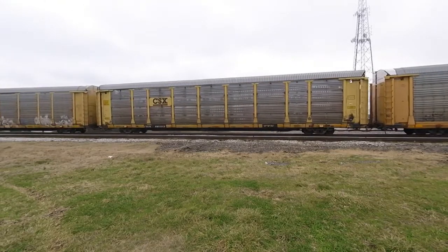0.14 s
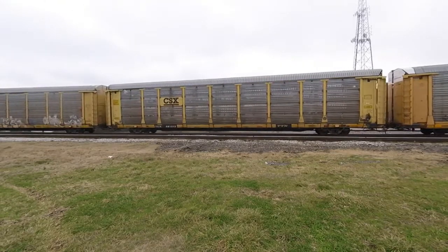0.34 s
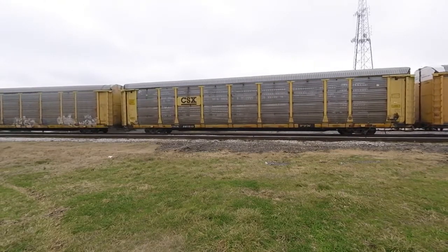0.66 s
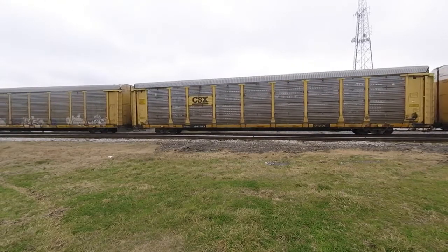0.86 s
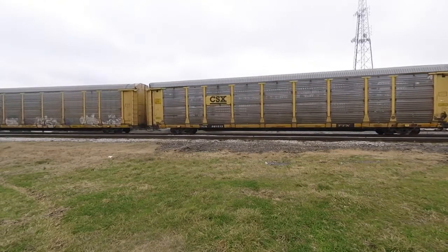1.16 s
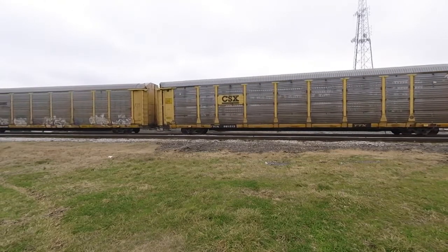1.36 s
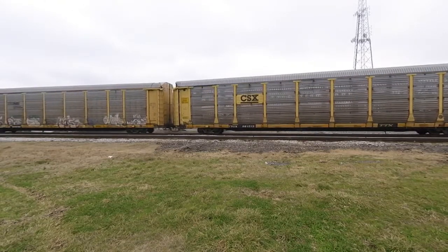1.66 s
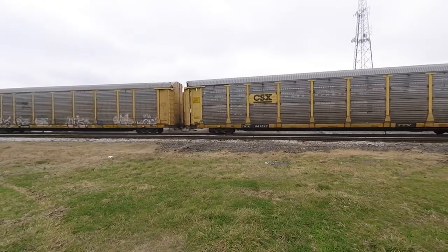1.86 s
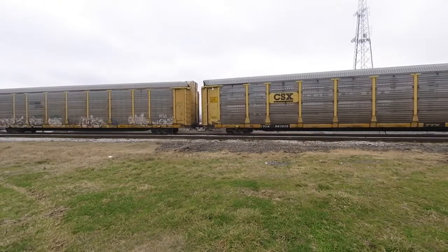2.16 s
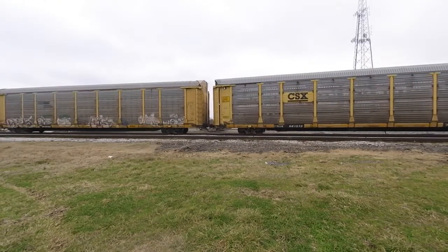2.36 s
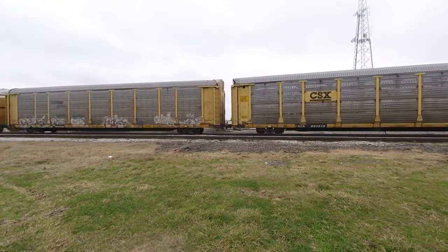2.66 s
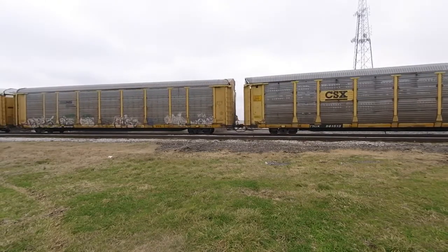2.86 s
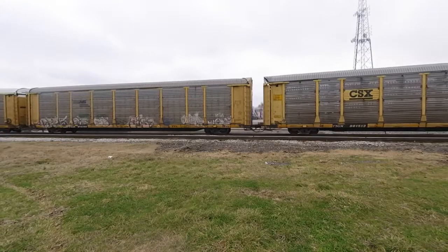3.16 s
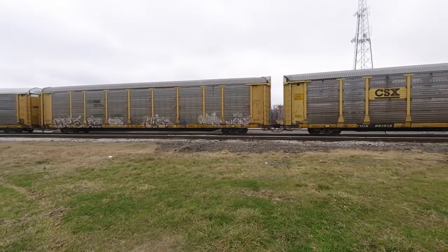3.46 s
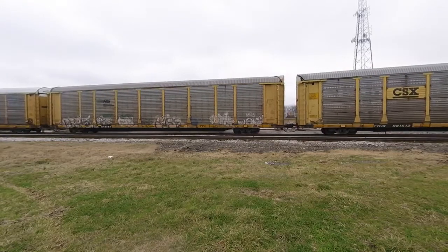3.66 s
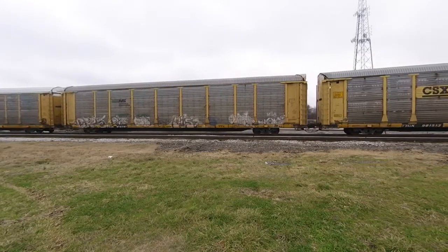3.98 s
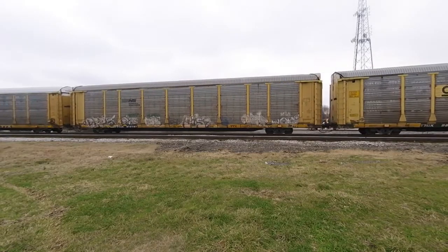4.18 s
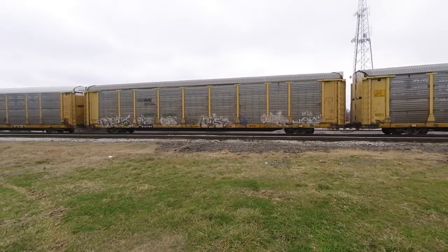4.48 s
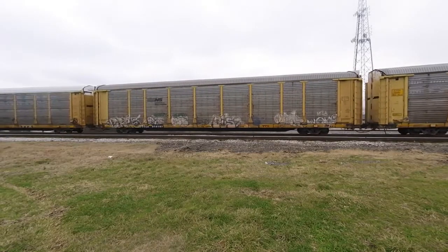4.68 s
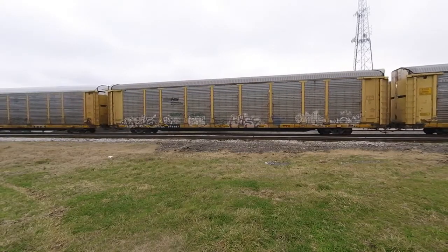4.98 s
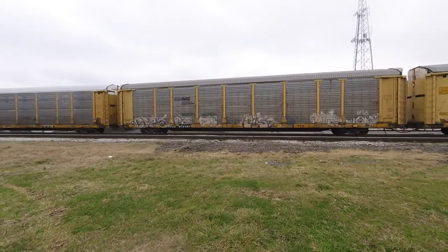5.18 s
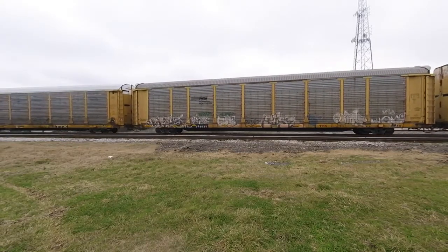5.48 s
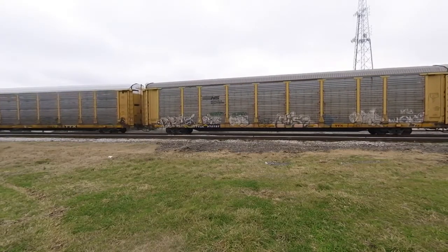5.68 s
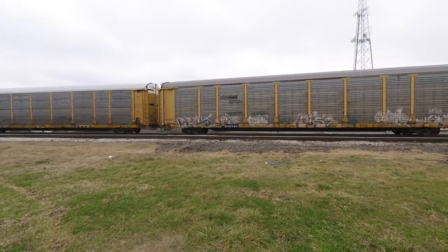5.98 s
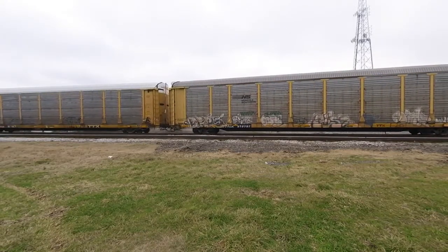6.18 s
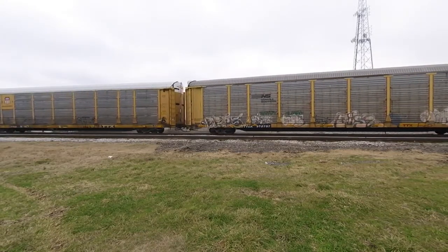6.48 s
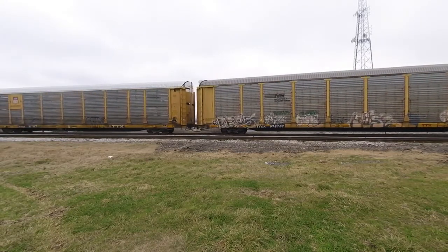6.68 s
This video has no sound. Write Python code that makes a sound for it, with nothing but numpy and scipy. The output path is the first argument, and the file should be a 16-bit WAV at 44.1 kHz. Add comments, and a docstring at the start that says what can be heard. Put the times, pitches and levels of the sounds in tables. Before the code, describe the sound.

Outdoors beside a railway track, slow freight cars pass. Wheel flanges squeal in clustered high metallic tones with a harsh scrape, ease off after about a second, then burst back. A second wheel takes over around three seconds with steadier, slightly lower ringing. Rolling rumble pulses softly underneath, and wind thumps and gusts on the exposed microphone, strongest mid-way. A low throbbing hum arrives near the end.

```python
"""Squealing, ringing flanges over a low rumble: freight cars roll slowly past a grassy field on a windy day.
Two wheels in turn rub their flanges on the rail: random friction rings many narrow modes of the steel,
which sink in pitch as the wheel passes. Strong modes lock into held tones; others catch by chance.
Shaped noise makes the scrape and the rolling; a throbbing low mode makes the drone.
Wind on the microphone is low and gusting noise with short pressure buffets."""
import sys
import numpy as np
from scipy import signal
from scipy.io import wavfile
from scipy.ndimage import uniform_filter1d

SR = 44100
rng = np.random.default_rng(int(sys.argv[2]) if len(sys.argv) > 2 else 0)


def transcribe(signal):
    """Save signal, clipped to [-1, 1], as a 16-bit WAV file at the path in sys.argv[1]."""
    frames = np.atleast_2d(signal).T
    limited = np.clip(frames, -1, 1)
    pcm = np.round(limited * 32767).astype(np.int16)
    wavfile.write(sys.argv[1], SR, pcm)


N = 301644
T_S = np.arange(N) / SR


def gain_of(db):
    """Amplitude gain of a level in dB."""
    return 10 ** (np.asarray(db) / 20)


def evened(x):
    """Scale to rms 1."""
    return x / np.sqrt(np.mean(x ** 2) + 1e-20)


def columns(rows):
    """Every column after the time column, as a curve over all samples."""
    s, *rest = np.transpose(rows)
    return [np.interp(T_S, s, column) for column in rest]


def drift(hz, length):
    """Slow random curve: one-pole filtered noise, changing about hz times a second."""
    knot_rate_hz = 40
    knots = rng.standard_normal(int(length / SR * knot_rate_hz) + 80)
    pole = np.exp(-np.pi * hz / 20)
    knots = evened(signal.lfilter([1], [1, -pole], knots)[40:])  # start-up dropped
    return np.interp(np.arange(length) / SR * knot_rate_hz, np.arange(len(knots)), knots)


def mode(hz, width_hz, length, skirt=1.0, steady=0., spread=1.56):
    """A mode rung by random friction: narrow core on a wide gritty skirt; stick-slip steadies the core (0-1)."""
    step = 32  # samples per point of the slow envelope
    a, b = rng.standard_normal((2, length // step + 402))
    push = a + 1j * b
    core_pole = np.exp(-np.pi * width_hz * step / SR)
    grit_pole = np.exp(-np.pi * spread * width_hz * step / SR)

    core = signal.lfilter([1], np.convolve([1, -core_pole], [1, -core_pole]), push)
    core /= np.sqrt(np.mean(abs(core) ** 2))
    core = core / (abs(core) + 0.14) ** np.clip(steady, 0, 1)
    grit = np.sqrt((1 - grit_pole ** 2) / 2) * signal.lfilter([1], [1, -grit_pole], push)
    slow = (skirt * grit + core)[400:]  # start-up dropped

    at, points = np.arange(length) / step, np.arange(len(slow))
    envelope = np.interp(at, points, slow.real) + 1j * np.interp(at, points, slow.imag)
    phase = 2 * np.pi * np.cumsum(hz * np.ones(length)) / SR
    return evened((envelope * np.exp(1j * phase)).real)


def noise(spectrum, level_db, patchy_db, flicker_db, size=512):
    """Random short-time spectra with drifting patches and a flicker shared by all bins."""
    hop = size // 4
    frames, hz = N // hop + 5, np.fft.rfftfreq(size, 1 / SR)
    a, b, patches = rng.standard_normal((frames, len(hz), 3)).T
    patches = uniform_filter1d(patches, size // 100, 0)  # over frequency
    patches = evened(uniform_filter1d(patches, 8192 // size, 1))  # over time
    flicker = evened(uniform_filter1d(rng.standard_normal(frames), 2048 // size + 1))

    f, db = np.transpose(spectrum)
    shape_db = np.interp(np.log(hz + 1), np.log(f), db, -120, -120)
    bins_db = shape_db[:, None] + patchy_db * patches + flicker_db * flicker
    x = signal.istft((a + 1j * b) * gain_of(bins_db), nperseg=size, noverlap=size - hop)[1][:N]
    return gain_of(level_db) * evened(x)


def held(spells, first, length):
    """Gain of a mode over its spells: lock, hold, let go; powers add."""
    lock_s, let_go_s = 0.046, 0.04
    t = (first + np.arange(length)) / SR
    power = np.zeros(length)
    for start, end, db in spells:
        ramp = np.minimum((t - start) / lock_s + .5, (end - t) / let_go_s + 1)
        power += gain_of(db) ** 2 * np.clip(ramp, 0, 1) ** 2
    return np.sqrt(power)


def wheel(sings, rings, pitch, rub_db, idle_db, catch_db, skirt, steady, fade_s):
    """Strong modes idle with the rubbing and lock into held tones; the rest catch or let go by chance."""
    # spells of held tone, keyed by mode f/Hz: start/s, end/s, level/dB before flutter and wheel fade
    spells = { "6540": [(0, .3, -33.5), (.3, .64, -27), (.66, .83, -34), (1.57, 1.95, -29),
              (1.98, 2.18, -26.5), (2.3, 2.4, -31), (2.5, 2.85, -35), (2.93, 3.3, -34.5)],
              "5400": [(0, .3, -33), (.4, .58, -35.5), (1.62, 1.9, -44), (1.98, 2.22, -38),
              (2.6, 3.1, -48)], "4772": [(0, .6, -42), (1.62, 1.9, -38), (2.05, 2.15, -38),
              (2.22, 2.4, -35.5), (2.7, 2.8, -43), (2.83, 2.93, -38)], "3432": [(0, .28, -44.5),
              (.34, .6, -43.5), (1.65, 1.8, -37.5), (1.8, 1.97, -45)], "2890": [(.05, .42, -39.5),
              (1.56, 1.68, -39), (1.75, 1.9, -39), (2.16, 2.25, -37), (2.33, 2.4, -42), (2.47, 2.58, -39),
              (2.7, 2.83, -36), (3.15, 3.25, -38)], "3745": [(.2, .45, -41), (1.6, 1.9, -48),
              (2.45, 2.6, -45)], "5210": [(3.25, 6.84, -39.5), (3.3, 3.68, -26.5), (3.75, 4, -37),
              (3.97, 4.14, -31), (4.18, 4.4, -29.5), (4.5, 4.97, -29.5), (5.05, 5.6, -41),
              (5.45, 5.62, -35), (5.7, 5.95, -35), (6.04, 6.24, -28.5), (6.35, 6.5, -33),
              (6.5, 6.8, -32.5)], "3412": [(3.28, 6.84, -44), (3.3, 3.5, -32), (3.45, 3.72, -34.5),
              (3.75, 3.8, -37), (3.97, 4.2, -35.5), (4.18, 4.47, -31.5), (4.55, 4.6, -37),
              (4.88, 5.08, -34), (5.1, 5.3, -35.5), (5.43, 5.7, -29), (5.72, 6.1, -35), (6.05, 6.38, -31.5),
              (6.45, 6.7, -39)], "2608": [(3.0, 3.15, -36), (3.3, 3.4, -42), (3.5, 3.65, -37),
              (3.78, 4.0, -37.5), (4.06, 4.16, -31.5), (4.25, 4.6, -37), (4.9, 5.2, -40), (5.45, 5.58, -40),
              (5.7, 6.0, -34), (6.08, 6.5, -35), (6.6, 6.84, -38.5)], "4290": [(2.98, 6.84, -45.5),
              (2.98, 3.2, -34), (4.58, 4.85, -37.5), (4.8, 5, -34), (5.07, 5.25, -37.5), (5.27, 5.45, -41),
              (5.8, 6.3, -40), (6.3, 6.5, -35.5), (6.55, 6.9, -42)], "6082": [(3.3, 4.15, -49),
              (4.85, 5.05, -41.5), (5.18, 5.58, -38), (5.78, 6.05, -35), (6.05, 6.3, -32), (6.3, 6.55, -37),
              (6.65, 6.84, -33.5)], "8620": [(5.75, 5.95, -42), (6.05, 6.2, -48), (6.28, 6.42, -42),
              (6.5, 6.84, -58)]}
    first, last = round(fade_s[0][0] * SR), min(round(fade_s[-1][0] * SR), N)
    length = last - first
    rub_db, factor = rub_db[first:last], columns(pitch)[0][first:last]
    sound = np.zeros(length)
    for hz, width_hz in sings:
        bent_hz = hz * factor * (1 + 0.0006 * drift(3.72, length))  # contact load bends the pitch
        level = np.hypot(held(spells[str(hz)], first, length), gain_of(rub_db + idle_db))
        flutter_db = 1.3 * drift(12, length)
        sound += level * gain_of(flutter_db) * mode(bent_hz, width_hz, length, skirt, steady)
    for hz, db in zip(*rings):
        catch = np.minimum(drift(2.5, length), 1.3)
        width_hz = 18 + 0.0039 * hz  # higher modes lose more
        sound += gain_of(rub_db + db + catch_db * catch) * mode(hz * factor, width_hz, length)
    out = np.zeros(N)
    out[first:last] = sound * np.interp(T_S[first:last], *np.transpose(fade_s))
    return out


def first_wheel(rub_db):
    """Flange of the first wheel: friction-rung modes, Doppler falling as it passes."""
    # strong modes: f/Hz, core width/Hz
    strong_modes = [(6540, 24), (5400, 24), (4772, 20), (3432, 16), (2890, 40), (3745, 28)]
    # weaker modes, two lists: f/Hz; level/dB over this wheel's rubbing
    weak_modes = ([1820, 1940, 2150, 2640, 3140, 4290, 4390, 5080, 5600, 5800, 6170, 6430, 6920, 2990, 3600,
                  4580, 5250, 5500, 5950, 7520, 8300, 8650, 9150, 9600, 10250, 10600, 11700, 12300, 12700,
                  13000, 13400, 13900], [-2, -2, -4, -2, 1, -1, -3, 0, 0, 2, -2, 0, -8, -2, -4, -2, 0, 0,
                  -1, -9, -11, -11, -17, -15, -11, -24, -30, -25, -23, -26, -30, -29])
    # Doppler: t/s, pitch factor
    doppler = [(0, 1.005), (.9, 1.004), (1.6, .998), (2.3, .996), (2.7, .993), (3.4, .992)]
    fade = [(0, 0.99), (3.15, 0.77), (3.4, 0.43)]  # t/s, gain; silent afterwards
    return wheel(strong_modes, weak_modes, doppler, rub_db - 14, idle_db=0, catch_db=5.6,
                 skirt=1.05, steady=0.64, fade_s=fade)


def second_wheel(rub_db):
    """Flange of the second wheel: other modes with steadier cores, falling in pitch likewise."""
    # strong modes: f/Hz, core width/Hz
    strong_modes = [(5210, 22), (3412, 18), (2608, 45), (4290, 32), (6082, 28), (8620, 24)]
    # weaker modes, two lists: f/Hz; level/dB over this wheel's rubbing
    weak_modes = ([1810, 1900, 2200, 2800, 3200, 2670, 5160, 5310, 5790, 6970, 7050, 7720, 7900, 8090, 8330,
                  8930, 9510, 10000, 10300, 10750, 11170, 11550, 12270, 12900, 13280, 13750], [-2, -2, -7,
                  -7, -7, -2, 0, -2, -6, -6, -8, -19, -14, -11, -16, -14, -16, -16, -21, -26, -21, -31, -25,
                  -28, -23, -33])
    # Doppler: t/s, pitch factor
    doppler = [(2.9, 1.004), (4.8, 1.003), (5.6, .998), (6.3, .994), (6.84, .992)]
    fade = [(2.9, 0.16), (3.3, 0.83), (6.84, 0.83)]  # t/s, gain
    return wheel(strong_modes, weak_modes, doppler, rub_db - 10.5, idle_db=-10, catch_db=2.9,
                 skirt=0.75, steady=0.81, fade_s=fade)


def squeals():
    """One mode catches for a moment, then dies away."""
    # short squeals: start/s, end/s, f/Hz, core width/Hz, level/dB before the taper
    catches = [(0, .55, 7530, 50, -47), (.1, .5, 1940, 10, -45.5), (.55, .72, 2150, 10, -44),
               (.7, .9, 1450, 12, -45), (1.33, 1.56, 4840, 70, -47), (1.58, 1.72, 2640, 35, -44),
               (1.59, 1.76, 1820, 30, -36.5), (1.6, 1.78, 6260, 30, -36), (1.6, 1.9, 6920, 20, -47),
               (1.6, 1.8, 4270, 40, -47), (1.62, 1.78, 5085, 25, -39), (2.0, 2.2, 12700, 50, -57),
               (2.03, 2.24, 5780, 35, -33), (2.55, 3.0, 1940, 12, -52), (2.9, 3.15, 10220, 54, -46),
               (3.15, 3.9, 6490, 30, -41), (3.72, 3.92, 4760, 15, -44), (4.2, 4.75, 8110, 32, -47),
               (4.2, 5.0, 13300, 40, -65), (5.2, 5.45, 5025, 15, -39), (5.75, 6.84, 11130, 50, -60),
               (5.78, 6.3, 2533, 10, -35.5), (5.85, 6.25, 2650, 15, -38), (5.95, 6.27, 5135, 12, -32.5),
               (6.08, 6.27, 5020, 30, -37), (6.3, 6.45, 4205, 15, -41), (6.45, 6.68, 5320, 25, -34),
               (6.68, 6.82, 4975, 15, -46), (6.72, 6.84, 5915, 22, -41)]
    out = np.zeros(N)
    for start, end, hz, width_hz, db in catches:
        part = out[round(start * SR):round(end * SR)]
        tone = mode(hz, width_hz, len(part), skirt=0.76, steady=0.28)
        part += gain_of(db) * tone * signal.windows.tukey(len(part), .5)
    return out


def rubbing_db():
    """How hard the flanges rub the rail; the contact chatters."""
    # rubbing before chatter: t/s, level/dB
    rub = [(0, -32.5), (.13, -33), (.45, -35.5), (.7, -34.5), (.85, -36.5), (.95, -44.5), (1.22, -49.5),
           (1.28, -44), (1.54, -47.5), (1.59, -31), (1.72, -28), (2.0, -36.5), (2.19, -32.5), (2.32, -37.5),
           (2.58, -32.5), (2.85, -31.5), (3.05, -36.5), (3.5, -35), (4.1, -35.5), (4.45, -37.5),
           (4.85, -35), (5.15, -37.5), (5.35, -35.5), (5.5, -32), (5.9, -33), (6.2, -28), (6.45, -31.5),
           (6.84, -30)]
    return columns(rub)[0] + 0.74 * drift(6.2, N)


def scrape(rub_db):
    """Broad friction noise following the rubbing."""
    # noise colour: f/Hz, relative density/dB
    colour = [(1200, -16), (2000, -7.5), (3000, -7), (4000, -9.5), (4700, -0.5), (5600, 2), (6300, -2),
              (7000, -10.5), (7400, -18.5), (9000, -17.5), (10600, -39), (11200, -70), (12800, -42),
              (14200, -50)]
    # the second wheel scrapes less and rings more: t/s, trim/dB
    trim = [(0, 0.2), (3.1, .6), (3.5, -0.3), (5.3, -1.2), (6.84, 0)]
    return noise(colour, rub_db + columns(trim)[0], patchy_db=1.4, flicker_db=1.8)


def rolling():
    """Rolling noise; a rough patch of tread modulates it once per turn of the wheel."""
    # noise colour: f/Hz, relative density/dB
    colour = [(150, -16.5), (350, -5), (500, -0.5), (800, -3), (1200, -7), (1600, -9.5), (2400, -12),
              (3500, -16), (5000, -32)]
    # rolling: t/s, base level/dB, swell per turn/dB (negative dips)
    levels = [(0, -38, 3), (1.0, -39, 5), (1.9, -38, 6.5), (2.6, -35, 7), (3.0, -38, 4), (3.7, -40, 1),
              (4.05, -35.5, 1.5), (4.3, -35.5, 3), (4.6, -36.5, 2), (5.1, -39.5, -1.5), (5.9, -36.5, -2),
              (6.84, -36.5, 0.5)]
    turn_s, turn_start_s, top = .405, 0.027, 0.27  # top: share of a turn at which the swell peaks
    db, swell_db = columns(levels)
    turn = (T_S - turn_start_s) / turn_s % 1
    swell = np.minimum(turn / top, (1 - turn) / (1 - top))
    return noise(colour, db + swell_db * swell, patchy_db=0.95, flicker_db=0.91)


def drone():
    """A low hum swells as the next car body draws near, and throbs."""
    # hum: t/s, level/dB before the throb, throb depth (0-1)
    swell = [(5.7, -24, 0.04), (6.0, -28, 0), (6.3, -28.5, 0.59), (6.7, -26.5, 0.6), (6.84, -28, 0.8)]
    drone_hz, throb_s, throb_top_s, onset_s = 101.7, 0.203, 6.66, 0.14
    db, depth = columns(swell)
    throb = 1 + np.clip(depth, 0, 1) * np.cos(2 * np.pi * (T_S - throb_top_s) / throb_s)
    onset = np.clip((T_S - swell[0][0]) / onset_s, 0, 1)
    return onset * gain_of(db) * throb * mode(drone_hz, 4.4, N, skirt=0.17, steady=0.77)


def wind():
    """Low wind and brighter gusting, shifted by each heave and shaken together by eddies."""
    # low wind colour: f/Hz, relative density/dB
    low_colour = [(15, -11), (30, -2), (50, -2.5), (80, -3.5), (120, -10.5), (200, -27.5), (300, -70)]
    # gusting colour: f/Hz, relative density/dB
    gust_colour = [(60, -37), (110, 2.5), (150, 1.5), (230, -1), (330, -10.5), (500, -18.5), (900, -31)]
    # wind before heaves and eddies: t/s, low level/dB, gusting level/dB
    air = [(0, -27.5, -33.5), (.9, -27.5, -34), (1.3, -26.5, -32), (1.7, -24.5, -32), (2.05, -27, -31.5),
           (2.4, -25, -30), (2.9, -21, -28.5), (3.3, -18, -28), (3.55, -25, -34.5), (3.82, -24.5, -35.5),
           (3.9, -21, -27.5), (4.05, -25, -33), (4.2, -25.5, -21), (4.5, -24, -24.5), (4.6, -26.5, -32),
           (5.0, -20, -23.5), (5.07, -29, -36.5), (5.3, -24, -31.5), (5.58, -30, -32), (5.75, -25, -32.5),
           (6.84, -28, -30)]
    # heaves: t/s, low shift/dB, gusting shift/dB
    heaves = [(.07, 9, 3), (.36, 5.5, -0.5), (.5, 6.5, -1), (.98, -2, 5), (1.7, 4, 4.5), (2.1, 3.5, 0),
              (2.2, 5.5, 2), (2.45, 7, 3), (2.6, 3, 1), (2.7, 4.5, 4.5), (2.88, 2, 6), (2.96, 3, 4),
              (3.13, 0, 2.5), (3.28, 2, 0), (3.68, 9, 1.5), (3.91, 5, 1), (4.11, 2, 1.5), (4.27, 5.5, 1),
              (4.45, -1, 1), (4.65, 8, 3), (4.86, 4, 6.5), (5.0, -1, 3), (5.31, 5.5, 5), (5.52, 6, 4),
              (5.68, 13.5, -1)]
    heave_s = 0.024  # half-width at 1/e
    wind_db, gust_db = columns(air)
    s, *lift_db = np.transpose(heaves)
    low_db, bright_db = lift_db @ np.exp(-((T_S - s[:, None]) / heave_s) ** 2)
    eddies = drift(7.8, N)
    low = noise(low_colour, wind_db + low_db + .7 * eddies, 0.71, 0.78, size=2048)
    gusting = noise(gust_colour, gust_db + bright_db + 0.98 * eddies, 0.87, 0.86, size=1024)
    return low + gusting


def buffets():
    """Each buffet is a brief drop in pressure with a rebound, and a short low puff of noise."""
    # buffets on the microphone: t/s, strength/dB before the drop and puff trims
    hits = [(0.496, -16.5), (0.788, -29), (1.578, -18), (1.821, -21), (2.69, -14.5), (2.817, -25),
            (2.87, -6.5), (2.934, -10.5), (3.127, -15), (3.171, -14), (3.329, -17), (3.439, -21),
            (3.639, -32), (3.885, -17.5), (4.025, -23), (4.088, -16), (4.238, -9), (4.369, -10.5),
            (4.416, -14), (4.468, -7.5), (4.637, -15), (4.83, -11.5), (4.91, -12.5), (4.994, -14.5),
            (5.131, -17), (5.203, -24), (5.297, -15), (5.391, -18), (5.467, -18.5), (5.66, -16),
            (5.788, -20), (6.127, -22), (6.331, -23), (6.546, -18.5)]
    out, t = np.zeros(N), np.arange(4000) / SR
    colour = signal.butter(1, [120 / SR * 2, 450 / SR * 2], "bandpass", output="sos")
    for s, db in hits:
        puff = signal.sosfilt(colour, rng.standard_normal(len(t)))
        puff = evened(signal.sosfilt(colour, puff))
        puff = puff * (1 - np.exp(-(t / 0.0032) ** 2)) * np.exp(-t / 0.015)
        u = (t - .006) / (0.002 * rng.uniform(0.45, 1.38))
        drop = (u ** 2 - 1) * np.exp(-u ** 2 / 2) * (1 - np.exp(-(t / 0.0012) ** 2))
        part = out[round(s * SR):][:len(t)]
        part += (gain_of(db - 5.5) * drop + gain_of(db - 9.0) * puff)[:len(part)]
    return out


def scene():
    """Both wheels and the scrape share one rubbing curve; track and wind lie below."""
    rub_db = rubbing_db()
    flanges = first_wheel(rub_db) + second_wheel(rub_db) + squeals()
    track = scrape(rub_db) + rolling() + drone()
    return (flanges + track + wind() + buffets())[None]


def record(dry):
    """Band limit: linear-phase low-pass."""
    edge_hz = 14250
    lowpass = signal.firwin(511, edge_hz, window=("kaiser", 9), fs=SR)
    return signal.oaconvolve(dry, lowpass[None], "same")


dry = scene()
out = record(dry)
transcribe(out)
```